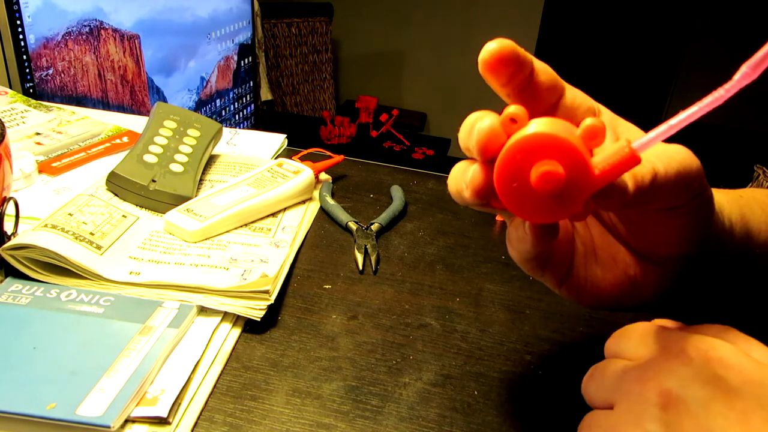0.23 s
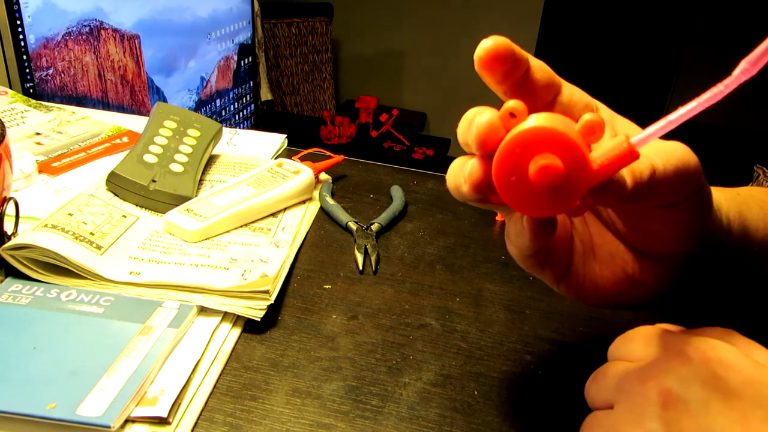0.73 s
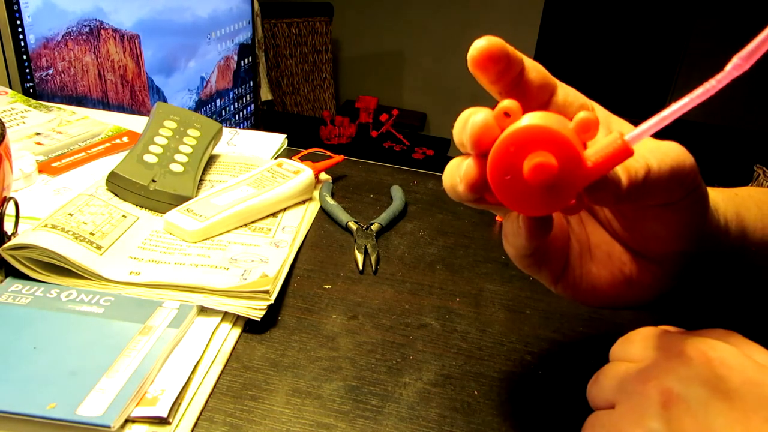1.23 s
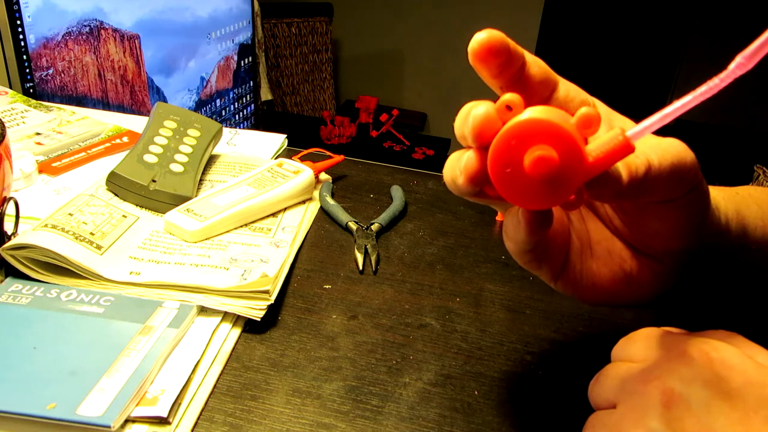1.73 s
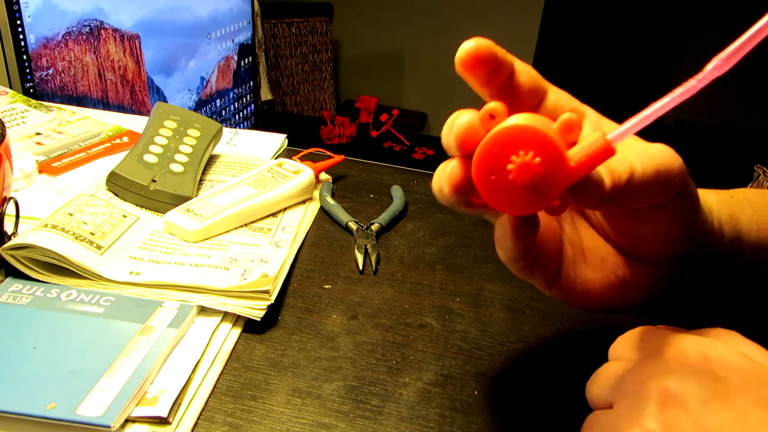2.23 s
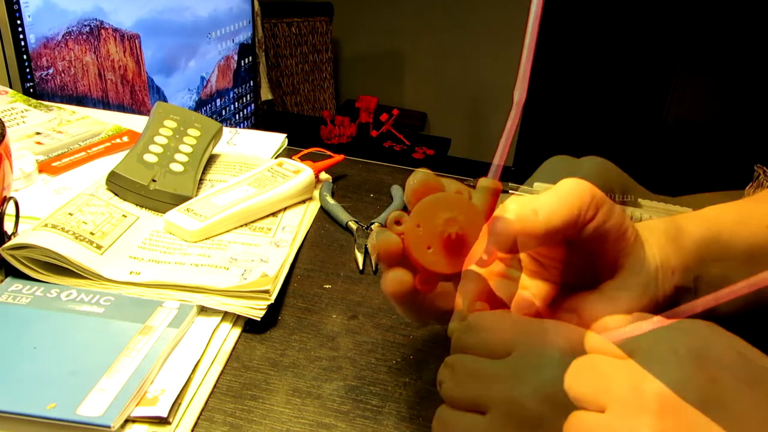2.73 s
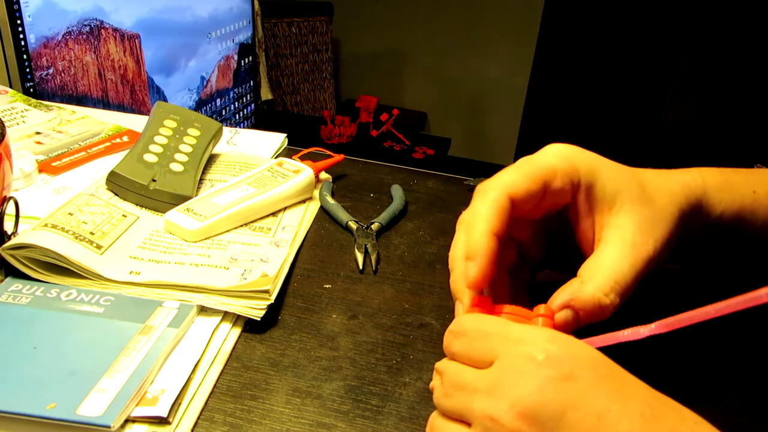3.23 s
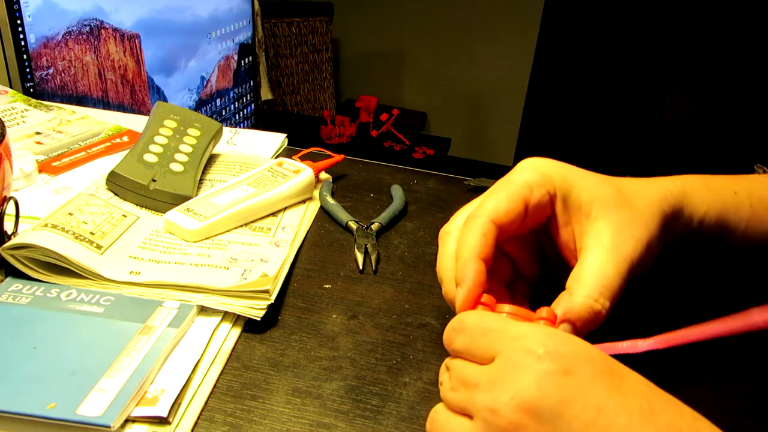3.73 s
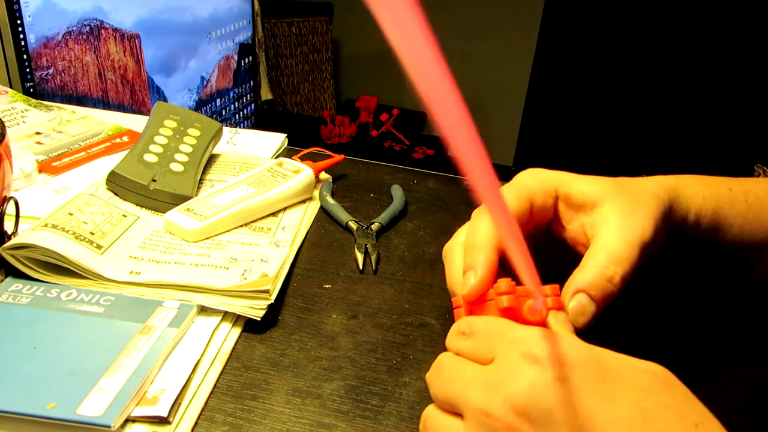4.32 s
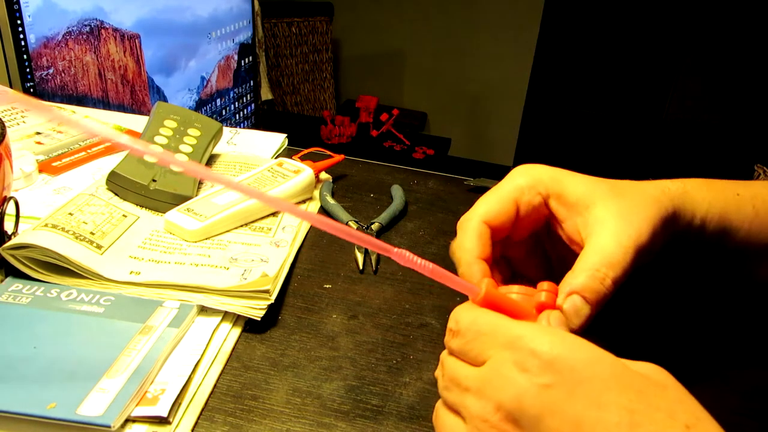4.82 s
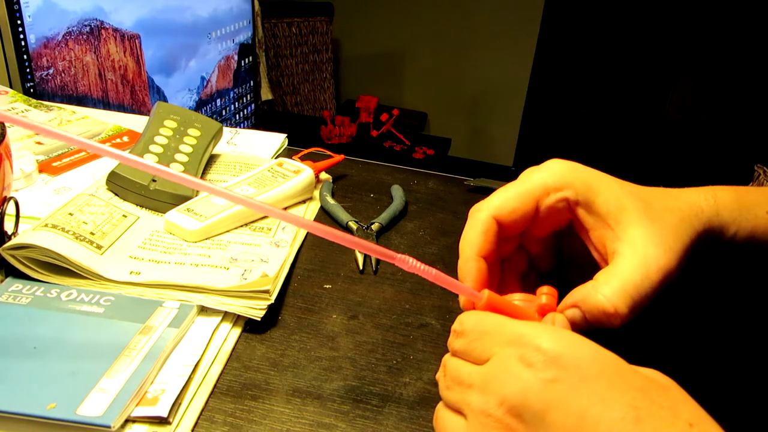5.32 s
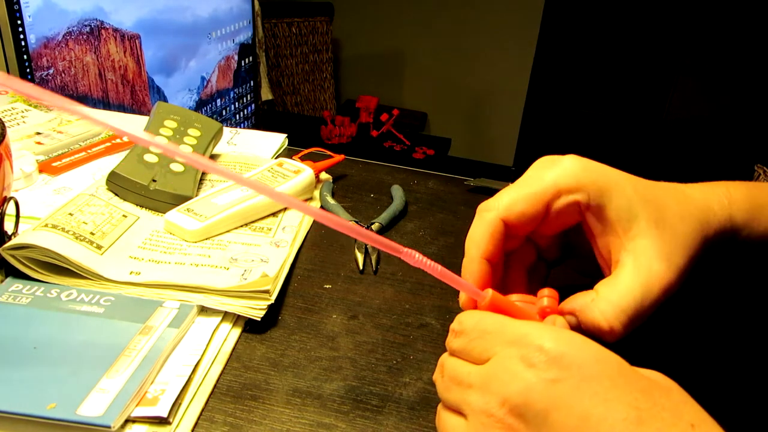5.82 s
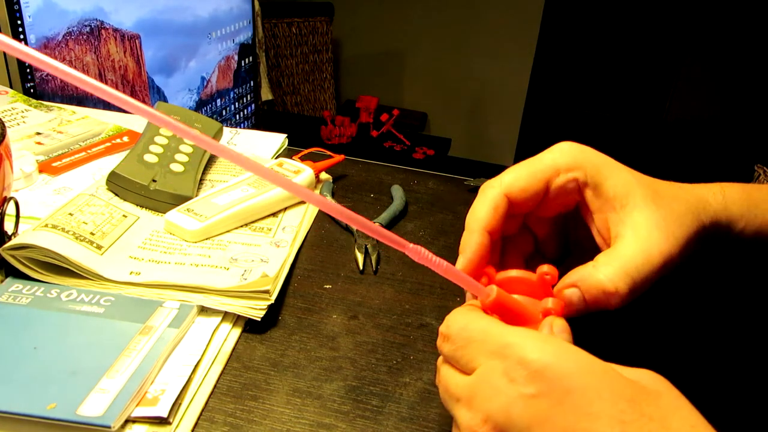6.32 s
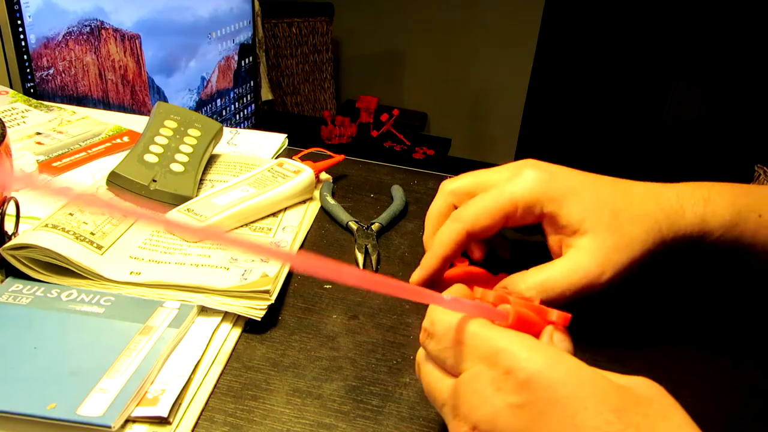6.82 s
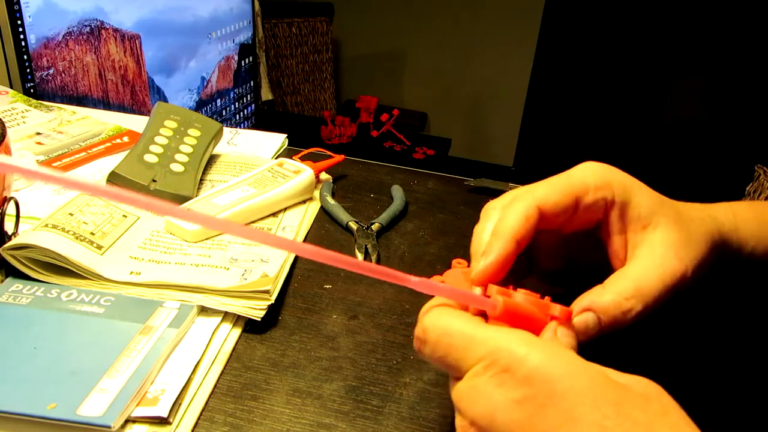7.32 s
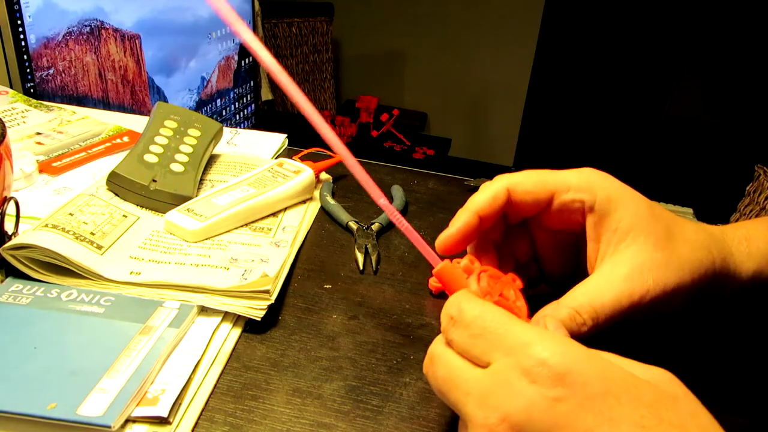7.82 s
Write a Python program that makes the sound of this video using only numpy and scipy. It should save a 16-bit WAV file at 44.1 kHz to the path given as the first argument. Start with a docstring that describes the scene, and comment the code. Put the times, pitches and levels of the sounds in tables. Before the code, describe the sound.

Loud raspy whirr of a small air-driven plastic rotor stops at two seconds; a sharp snap, quiet finger clicks and a bright lid pop follow.

```python
"""A small plastic air motor, held over a desk in a small room, spins on an air tube, a little right of a stereo pair.
Random knocks through housing resonances make its rattle; shaped noise makes the exhaust hiss and rim grazes.
The air is cut, the rotor runs down, and the case then snaps once. Fingers click and rub on it, as short friction
bursts and grainy swells; the lid snaps off and rings as decaying sines, and two faint rubs follow.
Random room echoes answer, over faint noise hiss and a thin electronic whine of two steady sines."""
import sys
import numpy as np
from scipy import signal
from scipy.fft import rfft, irfft, next_fast_len
from scipy.io import wavfile
from scipy.ndimage import uniform_filter1d, map_coordinates

SR = 44100
rng = np.random.default_rng(int(sys.argv[2]) if len(sys.argv) > 2 else 0)


def wav_out(sig):
    """Save sig, one row per channel (or a flat mono array), as 16-bit PCM at SR to the path in sys.argv[1]."""
    wavfile.write(sys.argv[1], SR, np.round(np.clip(np.atleast_2d(sig).T, -1, 1) * 32767).astype(np.int16))


N = 355393
TIME = np.arange(N) / SR

TURNS_PER_S, BRAKE_TURNS_PER_S2 = 89, 270  # speed under air, braking after the cut
CUT_S = 1.898  # the air is cut
SURGE_DB, SURGES_PER_S = 0.6, 17.98  # the rattle swells and slackens as the rotor wanders on its axle
GRIP_DRIFT = .011  # scale of the housing's pitch wander as the rotor shifts in it
HOLLOW_HZ, HOLLOW_GAIN = 2680, 1.1  # the coasting rotor turns hollow: its tone, and the gain added there

# resonances of housing and rotor: (frequency [Hz], width [Hz], level [dB])
HOUSING_MODES = [(1177, 250, -18), (1730, 194, -18), (2660, 200, -8), (2843, 150, -2.5), (3080, 170, -0.3),
                 (3650, 300, -9), (4630, 470, -20.5), (5530, 300, -13.5), (6800, 480, -11.5),
                 (9200, 930, -13)]
# colour of the exhaust air: (frequency [Hz], spectral level [dB per Hz])
EXHAUST_COLOUR = [(60, -52), (150, -32), (340, -23), (450, -24), (700, -17.5), (1100, -14), (1450, -11.5),
                  (1800, -6), (2300, -3.5), (3200, -3.5), (4100, 1), (7000, -2.5), (7800, -4),
                  (11500, -6.5), (15800, -19.5)]
# colour of the rotor's rim striking the wall, here and in grazes(): (frequency [Hz], spectral level [dB per Hz])
RIM_COLOUR = [(500, -44.5), (2500, -23.5), (6500, -4.5), (7900, -11), (9100, 0.5), (10500, -6.5),
              (12300, -7), (13500, -13), (15800, -19)]


def motor():
    """The rotor chatters in its loose bearing and chops the air that drives it."""
    speed = rotor_speed()
    turns = np.cumsum(speed) / SR
    # the unbalanced rotor presses harder once a turn and rocks every fourth
    once_a_turn = 0.9 * np.sin(2 * np.pi * turns)
    every_fourth = 0.92 * np.sin(np.pi / 2 * turns)
    whirl = amp(once_a_turn + every_fourth + 0.32 * wobble(45.8) + 0.61 * wobble(16.03))

    def body(hz):
        """Resonances of housing and rotor, with alternating signs."""
        total = 0
        for k, (centre, width, db) in enumerate(HOUSING_MODES):
            damping = 1j * hz * width
            total = total + (-1) ** k * amp(db) * damping / (centre * centre - hz * hz + damping)
        return total

    knocks = strikes(turns, per_turn=3, scatter=.15, spread_db=6.0)
    knocks = knocks + strikes(turns, per_turn=10, scatter=.4, spread_db=3.0)
    # reading the ringing at drifting positions bends its pitch
    position = np.arange(N) + GRIP_DRIFT * np.cumsum(wobble(9))
    ringing = map_coordinates(filtered(knocks, body), [position], order=5, mode="mirror")
    rattle = amp(-4.0 + SURGE_DB * wobble(SURGES_PER_S)) * unit(ringing)
    # the rim grazes the wall: bright scrapes with a decay constant under a millisecond
    hard = np.abs(strikes(turns, per_turn=3, scatter=.3, spread_db=3.5))
    scrape = signal.lfilter([1], [1, -np.exp(-1 / (0.00054 * SR))], hard) * rng.standard_normal(N)
    rim = amp(-9.0) * coloured(unit(scrape), lambda hz: along(RIM_COLOUR, hz))
    air = amp(0.43) * noise(EXHAUST_COLOUR)
    # a slower rotor knocks and grazes more softly, while the air hisses on
    vigour = speed / TURNS_PER_S
    buzz = whirl * (vigour ** 0.83 * rattle + vigour ** 2 * rim + air)
    # the sound dulls and turns hollow as the pressure goes
    spent = 1 - np.exp(-since(CUT_S) / 0.086)
    hollow = lambda hz: 0.98 * hump(hz, 11500, 0.62) - HOLLOW_GAIN * hump(hz, HOLLOW_HZ, 0.097)
    return amp(drive_db()) * (buzz - spent * filtered(buzz, hollow))


def rotor_speed():
    """Turns a second: slightly unsteady throughout, and braked evenly by friction after the cut."""
    steady = np.maximum(TURNS_PER_S - BRAKE_TURNS_PER_S2 * since(CUT_S), 1)
    return steady * (1 + .025 * wobble(14))


# the air supply: level at the start, and its slow sag as the pressure sinks
DRIVE_DB, SAG_DB_PER_S = -28, 0.86
# the valve shuts: a quick drop, its time constant, then the bleed of the air left in the tube
CUT_DROP_DB, VALVE_S, BLEED_DB_PER_S = 2.5, 0.0072, 80
SETTLE_S, SETTLE_DB_PER_S = 2.021, 300  # the last soft turns


def drive_db():
    """Level of the motor: it sags under air, drops as the valve shuts and dies as the rotor settles."""
    shut = 1 - np.exp(-since(CUT_S) / VALVE_S)
    run_down = CUT_DROP_DB * shut + BLEED_DB_PER_S * since(CUT_S) + SETTLE_DB_PER_S * since(SETTLE_S)
    return DRIVE_DB - SAG_DB_PER_S * TIME - run_down


def strikes(turns, per_turn, scatter, spread_db):
    """Impulses of rms 1, per_turn to each turn, uneven in time and size."""
    marks = np.arange(int(turns[-1] * per_turn))
    stray, size, sign = rng.standard_normal((len(marks), 3)).T
    at = np.interp((marks + scatter * stray) / per_turn, turns, np.arange(N)).astype(int)
    return unit(np.bincount(at, np.sign(sign) * amp(spread_db * np.minimum(size, 2)), N))


# the hardest grazes of the rim: (time [s], relative level [dB])
HARD_GRAZES = [(.235, -10), (.238, -12), (0.4145, -10), (.598, -14), (0.649, -15), (.696, -15), (.879, -17),
               (1.0305, -7), (1.078, -12), (1.257, -9), (1.532, -17), (1.661, -20), (1.897, -13),
               (1.958, -19), (1.965, -27), (2.010, -34), (2.015, -34), (2.025, -39)]


def grazes():
    """Now and then the rim catches the wall hard: ticks of quickly decaying noise."""
    out, t = np.zeros(N), np.arange(SR // 100) / SR
    for s, db in HARD_GRAZES:
        add(out, s, amp(db - 2.0) * rng.standard_normal(len(t)) * np.exp(-t / 0.00059))
    return coloured(out, lambda hz: along(RIM_COLOUR, hz))


# contacts of the lid as it springs off: (time [s], level [dB], treble [dB])
LID_KNOCKS = [(6.843, -21.5, -4), (6.8445, -16.5, 5), (6.8487, -18.5, -10), (6.8616, -24, -5),
              (6.8735, -26, -2), (6.8892, -29, 2), (6.9097, -35, 2)]
# colour of these contacts: (frequency [Hz], spectral level [dB per Hz])
LID_COLOUR = [(200, -53), (420, -23), (540, -16), (750, -12.5), (930, -17.5), (1250, -9.5), (1600, -13.5),
              (1950, -7.5), (2450, -6), (3100, -0.5), (3600, -1), (4600, -8), (5800, -11.5), (6500, -4.5),
              (7600, -2.5), (8400, -15.5), (9400, -11.5), (10500, -16.5), (11700, -9.5), (12600, -26),
              (15500, -24)]
# ringing of the freed parts, with close modes that beat: (frequency [Hz], relative level [dB], t60 [s])
LID_MODES = [(1954, -20, 0.42), (2770, -20, .32), (3002, -5, 0.38), (3030, -2, 0.44), (3066, -2.5, 0.35),
             (3140, -4, 0.32), (3311, -17, .35), (3500, -13, 0.32), (4210, -18, .32), (5190, -21, .29),
             (6350, -14, .26), (6480, -13, 0.3), (7445, -15, .27), (7530, -11, 0.29)]


def lid():
    """The lid springs off in a quick burst of contacts that set the loose parts ringing."""
    cracks, ringing, t = np.zeros(N), np.zeros(N), np.arange(SR // 2) / SR
    for s, db, treble_db in LID_KNOCKS:
        colour = lambda hz: along(LID_COLOUR, hz) + treble_db * hump(hz, 12000, 0.63)
        add(cracks, s, amp(db) * coloured(slip(0.0045, rise_s=0.00031), colour))
    ring = 0
    for hz, db, t60 in LID_MODES:
        ring = ring + amp(db - 60 * t / t60) * np.sin(2 * np.pi * (hz * t + rng.random()))
    add(ringing, LID_KNOCKS[0][0], amp(-28.0) * ring * (1 - np.exp(-t / 0.00097)))
    return room(cracks, wet_db=-2.5, early_db=-9.5) + ringing  # the ringing stays dry


# the housing snaps once in the grip: moment, level, time of the slip to fall 20 dB
SNAP_S, SNAP_DB, SNAP_LENGTH_S = 2.6862, -19, 0.0035
# colour of that snap: (frequency [Hz], spectral level [dB per Hz])
SNAP_COLOUR = [(150, -48), (640, -10), (950, -15), (1280, -6.5), (1600, -17), (1950, -10), (2400, 0),
               (2800, -8), (3250, -5), (3700, 0.5), (4500, 3), (5200, -6), (5650, -1), (6600, -16),
               (7600, -8), (9000, -13), (10000, -17), (15000, -24)]


def snap():
    """One hard, bright slip of the housing's plastic."""
    out = np.zeros(N)
    burst = slip(SNAP_LENGTH_S, rise_s=0.00061)
    add(out, SNAP_S - .001, amp(SNAP_DB) * coloured(burst, lambda hz: along(SNAP_COLOUR, hz)))
    return out


CLICK_TONE_DB, CLICK_TONE_OCTAVES = 5, 0.45  # how far a click's own tone stands out, and its width
# clicks of the case under the fingers:
# (time [s], relative level [dB], tone [Hz], treble [dB], time to fall 20 dB [s], freedom to ring [0-1])
CASE_CLICKS = [(2.801, -42.5, 3500, 0, 0.014, .1), (2.810, -36, 4300, -2, 0.0067, 0.2),
               (2.8145, -40.5, 4400, 2, 0.0078, .1), (5.5912, -34.5, 2300, -8, 0.0073, 0.95),
               (5.845, -45, 1650, -8, 0.0052, .5), (5.853, -41, 1900, -7, 0.0084, .9),
               (5.869, -44.5, 2700, 1, 0.008, .6), (5.875, -43.5, 3300, 6, 0.0067, .6),
               (5.9075, -39, 2600, -9, 0.0028, .1), (6.065, -42, 3400, 0, 0.0071, .9),
               (6.084, -48.5, 3300, 10, 0.0076, .9), (6.180, -51.5, 2700, -5, 0.0099, .4)]
# a click away from its main tone: (frequency [Hz], spectral level [dB per Hz])
CASE_COLOUR = [(150, -46), (720, -1.5), (950, -11), (1280, 1), (1580, -8), (1880, -0.5), (2150, -1.5),
               (2480, 2), (2800, 0), (3300, -2), (4100, -3), (4700, -8.5), (5800, -8), (6600, -10.5),
               (7700, -10), (10000, -15.5), (15000, -21)]
# thin rings of the case in every click: (frequency [Hz], level when free [dB], width [octaves])
THIN_RINGS = [(1890, 4.5, .06), (2440, 2, .05), (3270, 7.5, 0.056), (5230, 12.5, 0.038)]


def clicks():
    """Short slips of plastic on plastic, each with its own tone and thin case rings the grip may damp."""
    out = np.zeros(N)
    for s, db, tone_hz, treble_db, length, free in CASE_CLICKS:

        def colour(hz):
            """Case colour with this click's rings, tone and treble, in dB."""
            rings = free * sum(ring_db * hump(hz, ring_hz, width) for ring_hz, ring_db, width in THIN_RINGS)
            tone = CLICK_TONE_DB * hump(hz, tone_hz, CLICK_TONE_OCTAVES)
            return along(CASE_COLOUR, hz) + rings + tone + treble_db * hump(hz, 10500, 0.53)

        add(out, s - .001, amp(db + 1.0) * coloured(slip(length, rise_s=0.00044), colour))
    return out


def slip(length_s, rise_s):
    """Plastic slipping on plastic: a burst of friction, its spectrum evened out, falling 20 dB in length_s."""
    t = np.arange(SR // 10) / SR
    burst = rng.standard_normal(len(t)) * (1 - np.exp(-t / abs(rise_s))) * amp(-20 * t / abs(length_s))
    power = uniform_filter1d(np.abs(rfft(burst)) ** 2, size=40)
    burst_hz = np.fft.rfftfreq(len(t), 1 / SR)
    even = coloured(burst, lambda hz: -10 * np.log10(np.interp(hz, burst_hz, power)))
    return even * np.linalg.norm(burst) / np.linalg.norm(even)


# fingers and tube sliding on the case:
# (time of the peak [s], relative level [dB], time from peak to 1/e [s], tone [Hz])
CASE_RUBS = [(2.97, -68, .08, 1500), (3.019, -68.5, 0.054, 4500), (4.172, -66.5, .045, 3430),
             (4.476, -63.5, 0.035, 5300), (5.865, -58, .014, 1400), (7.24, -73, .02, 3500),
             (7.364, -67, 0.014, 4800)]


def rubs():
    """Soft grainy swells of friction: noise of uneven grain size around one broad tone."""
    out = np.zeros(N)
    for s, db, length, tone_hz in CASE_RUBS:
        grains = unit(rng.standard_normal(SR) * amp(3 * rng.standard_normal(SR)))
        swell = np.exp(-((np.arange(SR) / SR - .5) / length) ** 2)
        add(out, s - .5, amp(db) * swell * coloured(grains, lambda hz: 22 * hump(hz, tone_hz, 0.93)))
    return out


# decay of the small room: (frequency [Hz], t60 [s])
ROOM_DECAY = [(200, 0.44), (1000, 0.64), (3000, 0.42), (4500, 0.39), (7000, 0.33), (14000, 0.15)]


def room(x, wet_db, early_db):
    """Direct sound, early bounces off desk and hands, and a tail that differs at each microphone."""
    hz, t, z = signal.stft(rng.standard_normal((2, SR // 2)), SR, nperseg=256)
    decay = amp(-60 * t / along(ROOM_DECAY, hz)[:, None]) * (1 - np.exp(-t / 0.0061))
    tail = signal.istft(z * decay, SR, nperseg=256)[1]
    tail /= np.linalg.norm(tail[0])
    delay = np.arange(tail.shape[1]) / SR
    early = rng.standard_normal(len(delay)) * (delay > .0005) * amp(-60 * delay / 0.05)
    response = amp(wet_db) * tail + amp(early_db) * early / np.linalg.norm(early)
    return x + signal.fftconvolve(x[None], response, axes=1)[:, :N]


# background hiss common to both channels: (frequency [Hz], spectral level [dB per Hz])
HISS_COMMON = [(15, -40), (25, -8), (146, -6.5), (223, -3.5), (277, 0), (413, -8), (447, -5.5), (511, -5.5),
               (872, -4), (1660, -8), (2280, -8.5), (6300, -13.5), (7590, -14), (8220, -14.5),
               (14800, -21.5)]
# background hiss opposed between the channels: (frequency [Hz], spectral level [dB per Hz])
HISS_OPPOSED = [(15, -41), (25, -8), (59, -3.5), (103, -5), (361, -2), (447, -4.5), (743, -1), (1840, -6),
                (6470, -18), (8010, -16), (8670, -21.5), (14800, -29)]
# electronic whine: (frequency [Hz], level [dB])
WHINE_TONES = [(7867, -67), (15734, -73.5)]


def background():
    """Steady noise hiss, mostly opposed between the channels, and a thin whine of sines."""
    mid = amp(-64) * noise(HISS_COMMON)
    side = amp(-52.0) * noise(HISS_OPPOSED)
    whine = sum(np.sqrt(2) * amp(db) * np.sin(2 * np.pi * hz * TIME) for hz, db in WHINE_TONES)
    return np.array([mid + side, mid - side]) + whine


def amp(db):
    """Decibels to gain."""
    return 10 ** (np.asarray(db) / 20)


def unit(x):
    """Scale to rms 1."""
    return x / np.sqrt(np.mean(x ** 2) + 1e-20)


def since(s):
    """Seconds since time s at every sample, zero before it."""
    return np.maximum(TIME - s, 0)


def along(points, hz):
    """Read (frequency [Hz], value) points on a log axis."""
    f, v = np.transpose(points)
    return np.interp(np.log(hz + 1), np.log(f + 1), v)


def hump(hz, centre_hz, octaves):
    """A bell of height 1 on a log-frequency axis."""
    return np.exp(-.5 * (np.log2((hz + 1) / centre_hz) / octaves) ** 2)


def wobble(rate):
    """A smooth random curve with rate knots a second."""
    return map_coordinates(rng.standard_normal(int(N * rate / SR) + 4), [TIME * rate])


def filtered(x, response):
    """Filter x by a response of frequency, which may be complex."""
    size = x.shape[-1]
    m = next_fast_len(size + 8192)
    return irfft(rfft(x, m) * response(np.fft.rfftfreq(m, 1 / SR)), m)[..., :size]


def coloured(x, level):
    """Causal filter of unit energy whose gain follows level(hz) in dB, up to a constant."""
    size = 4096
    cepstrum = irfft(np.log(amp(level(np.fft.rfftfreq(size, 1 / SR))) + 1e-6))
    # folding the cepstrum gives minimum phase
    cepstrum[1:size // 2] *= 2
    cepstrum[size // 2 + 1:] = 0
    impulse = irfft(np.exp(rfft(cepstrum)))
    return signal.fftconvolve(x, impulse / np.linalg.norm(impulse))[:len(x)]


def noise(spectrum):
    """Noise of about rms 1 with the given spectrum."""
    return coloured(rng.standard_normal(N), lambda hz: along(spectrum, hz))


def add(track, s, sound):
    """Mix a sound into the track at time s."""
    start = round(s * SR)
    track[start:start + len(sound)] += sound[:N - start]


def scene():
    """Motor and handling sit a little right of the microphones; lid and background join them."""
    spinning = room(motor() + grazes(), wet_db=-8.5, early_db=-13.5)
    # the jet reaches the two microphones less alike in the treble, more alike around 1950 Hz
    spread = lambda hz: 2.0 * hump(hz, 16600, .45) - 0.94 * hump(hz, 1950, 0.44)
    width = filtered(spinning - spinning.mean(axis=0), spread)
    lean = lambda hz: amp(np.array([[-1], [1]]) * 0.88 * hump(hz, 2200, 1.0))
    # the handling is low over the desk, with stronger bounces
    handling = room(snap() + clicks() + rubs(), wet_db=-3.5, early_db=-8) * amp([[-.5], [.5]])
    return filtered(spinning + width, lean) + handling + lid() + background()


TOP_HZ = 15800  # upper band limit


def record(dry):
    """The gain behind the microphones eases under sustained loud sound; the band ends at TOP_HZ."""
    ease = np.exp(-1 / (.09 * SR))  # 0.09 s time constant
    level = np.abs(dry).mean(axis=0)
    held = signal.lfilter([1 - ease], [1, -ease], level, zi=[level[:SR // 10].mean()])[0]
    return filtered(dry * amp(-3 * held / (held + 0.0074)), lambda hz: hz < TOP_HZ)


dry = scene()
out = record(dry)
wav_out(out)
```